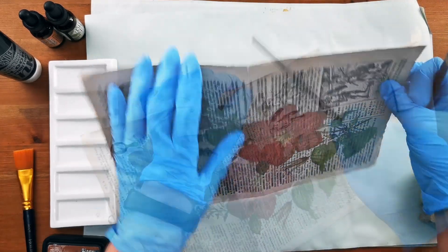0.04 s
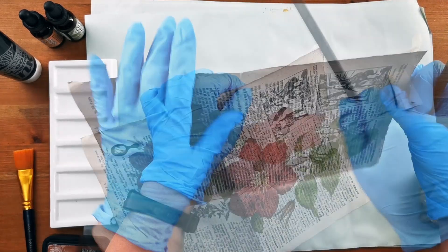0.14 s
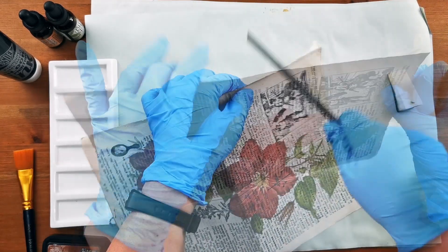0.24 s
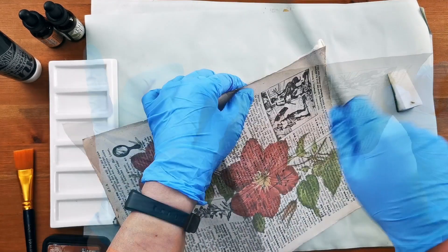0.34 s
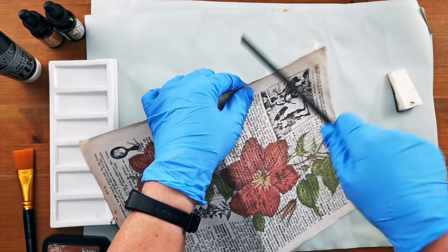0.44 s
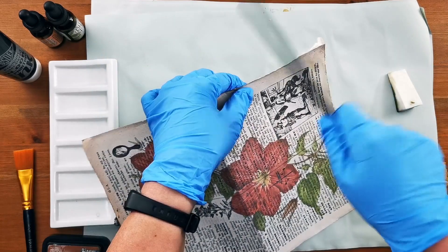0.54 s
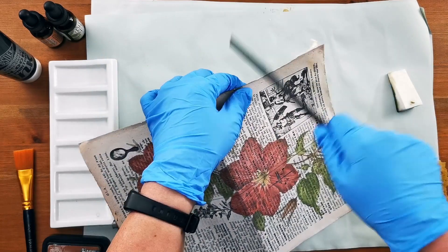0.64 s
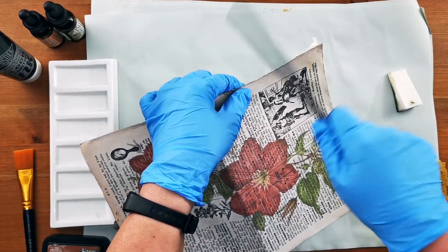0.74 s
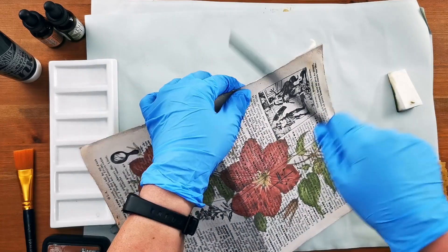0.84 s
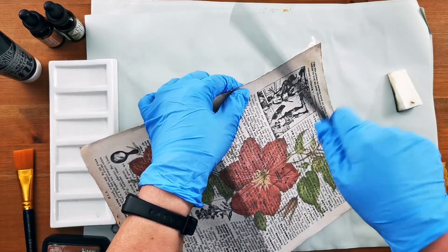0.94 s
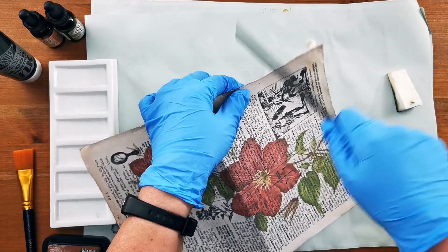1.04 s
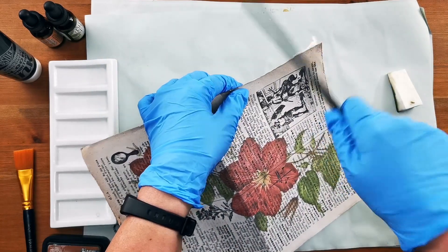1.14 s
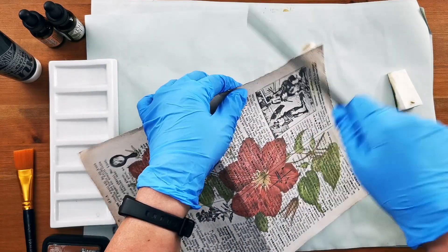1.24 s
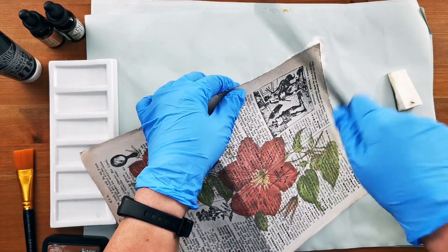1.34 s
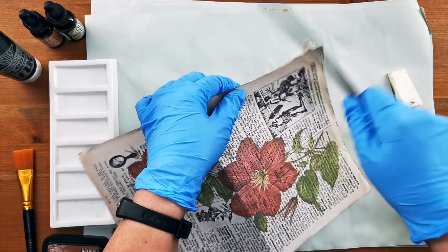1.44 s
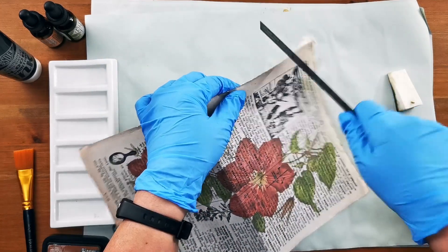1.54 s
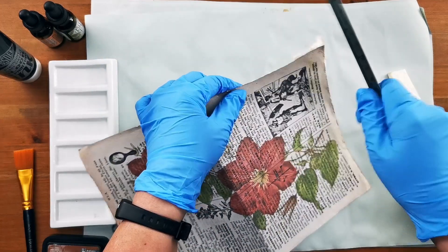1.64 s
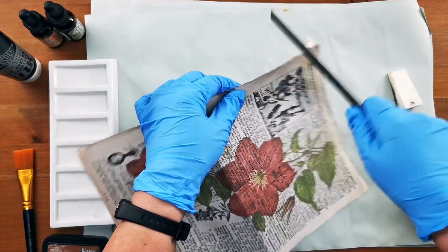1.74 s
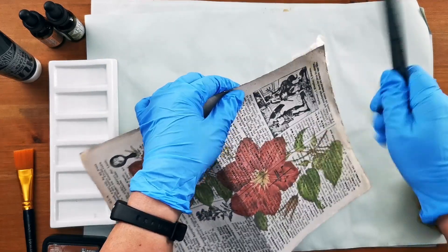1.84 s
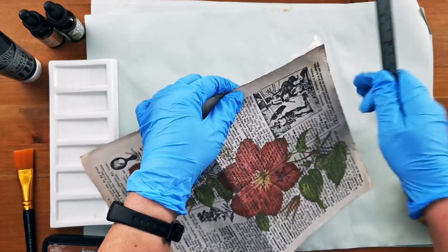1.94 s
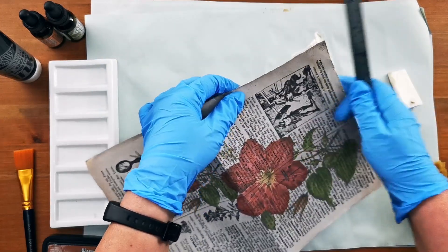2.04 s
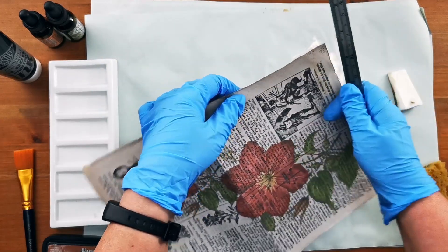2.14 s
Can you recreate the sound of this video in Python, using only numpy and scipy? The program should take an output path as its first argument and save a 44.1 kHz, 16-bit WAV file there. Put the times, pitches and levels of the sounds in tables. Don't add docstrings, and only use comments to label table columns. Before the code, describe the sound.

Quick dry cracks of a steel ruler flicked against heavy paper, with light rustling between blows

```python
import sys
import numpy as np
from scipy import signal
from scipy.fft import rfft, irfft
from scipy.io import wavfile
from scipy.ndimage import uniform_filter1d

SR = 44100
rng = np.random.default_rng(int(sys.argv[2]) if len(sys.argv) > 2 else 0)


def to_wav(sig):
    pcm = np.clip(np.atleast_2d(sig), -1, 1) * 32767
    pcm = np.round(pcm).astype(np.int16)
    wavfile.write(sys.argv[1], SR, pcm.T)


def voltage_ratio(level):
    return 10 ** (np.asarray(level, float) / 20)


N = 97020


def evened(x):
    return x / np.sqrt(np.mean(x ** 2) + 1e-20)


def read(points, hz):
    f, value = np.transpose(points)
    return np.interp(np.log(hz + 1), np.log(f + 1), value)


def colour(x, points):
    gain = voltage_ratio(read(points, np.fft.rfftfreq(len(x), 1 / SR)))
    return irfft(rfft(x) * gain, len(x))


def tilt(x, bright_db):
    b, a = signal.butter(1, 3500, "high", fs=SR)
    return x + (voltage_ratio(bright_db) - 1) * signal.lfilter(b, a, x)


def add(mix, s, sound):
    part = mix[round(s * SR):][:len(sound)]
    part += sound[:len(part)]


def ring(hz, t60, t):
    return voltage_ratio(-60 * t / t60) * np.sin(2 * np.pi * hz * t)


def rustle():
    # time in seconds, rustle level in dB.
    hands = [(0, -41.5), (.07, -37), (0.102, -43.5), (0.128, -31.5), (.2, -43.5), (0.234, -41),
             (.29, -52.5), (.94, -132), (0.993, -44), (1.02, -67), (1.3, -49), (1.34, -47), (1.4, -59.5),
             (1.88, -49), (1.955, -37), (1.985, -48), (2.131, -51.5), (2.2, -45.5)]
    # frequency in Hz, rustle spectrum in dB.
    rustle_colour = [(250, -39), (700, -16.5), (1500, -2), (2800, -5), (4700, -2), (7000, -4.5),
                     (11000, -8.5), (16000, -7.5)]
    grains_per_s, grain_spread_db, grain_share, flicker_db = 3000, 4, 0.3, 1.2
    sizes = voltage_ratio(grain_spread_db * np.minimum(rng.exponential(1, N), 4))
    occurs = rng.random(N) < grains_per_s / SR
    grains = sizes * occurs * rng.choice([-1., 1.], N)
    friction = grain_share * evened(grains) + (1 - grain_share) * rng.standard_normal(N)
    slow = uniform_filter1d(rng.standard_normal(N), size=300)
    flicker = evened(uniform_filter1d(slow, size=300))
    s, db = np.transpose(hands)
    motion_db = np.interp(np.arange(N) / SR, s, db)
    return evened(colour(friction, rustle_colour)) * voltage_ratio(motion_db + flicker_db * flicker)


def air():
    # frequency in Hz, murmur spectrum in dB.
    murmur = [(20, -20), (65, -6.5), (105, 3.5), (160, -4), (330, -8), (620, 3), (2500, -1), (15500, -24)]
    return voltage_ratio(-54) * evened(colour(rng.standard_normal(N), murmur))


def snaps(t, span, count):
    fade_db, spread_db = -9, 4
    out = np.zeros(len(t))
    draw = rng.random((count, 3))
    late = draw[:, 0] * (np.arange(count) > 0)
    size = voltage_ratio(fade_db * late - 2 * spread_db * draw[:, 1] * (late > 0))
    sign = np.where((draw[:, 2] < .5) | (late == 0), 1, -1)
    np.add.at(out, (late * span * SR).astype(int), size * sign)
    return out


def sheet(drive, t, boom_db):
    # resonance frequency in Hz, width in Hz, level in dB.
    sheet_modes = [(642.3, 83.3, 29.5), (710, 47, 9.5), (1084, 274, 10.5), (1418, 99, 16.5),
                   (1848, 230, 20.5), (2460, 87, 0.5), (2750, 780, -3), (3820, 390, -31), (5004, 133, 17),
                   (5700, 450, -51), (6500, 500, -40), (9450, 2700, -52), (12700, 4200, -18)]
    push_s, boom_top_hz, max_q = .0013, 900, 14
    detune, colour_db = .02, 2
    push = signal.oaconvolve(drive, np.hanning(round(push_s * SR / 2)))[:len(t)]
    push = push * np.linalg.norm(drive) / np.linalg.norm(push)
    out = np.zeros(len(t))
    draw = rng.uniform(-1, 1, (len(sheet_modes), 2))
    for (hz, width, db), (a, b) in zip(sheet_modes, draw):
        low = hz < boom_top_hz
        t60 = 2.2 / max(width, hz / max_q)
        mode = ring(hz * (1 + detune * a), t60, t)
        rung = signal.oaconvolve(push if low else drive, mode)[:len(t)]
        rung = rung * np.linalg.norm(mode) / np.linalg.norm(rung)
        out += voltage_ratio(db + colour_db * b + boom_db * low) * rung
    return out


def blow(db, boom_db, bright_db):
    # frequency in Hz, crack spectrum in dB.
    crack_colour = [(300, -30), (600, -8), (1400, 0), (3000, -7), (6000, -8), (9000, -11), (13000, -13),
                    (16000, -20)]
    hold_s, crack_t60, fizz_db, fizz_t60 = .0028, .008, -8, .045
    t = np.arange(4096) / SR
    body = sheet(snaps(t, span=.0024, count=6), t, boom_db)
    burst = voltage_ratio(-60 * np.maximum(t - hold_s, 0) / crack_t60)
    fizz = voltage_ratio(fizz_db - 60 * t / fizz_t60)
    crack = evened(colour(rng.standard_normal(len(t)), crack_colour)) * (burst + fizz)
    return voltage_ratio(db) * tilt(body / abs(body).max() + voltage_ratio(-14) * crack, bright_db)


def thin(x):
    cut = signal.sosfilt(signal.butter(4, 567, "high", fs=SR, output="sos"), x)
    leak = signal.sosfilt(signal.butter(2, 180, "high", fs=SR, output="sos"), x)
    return cut + voltage_ratio(-23.5) * leak


def room(x):
    # frequency in Hz, reverberation time t60 in seconds.
    band_t60 = [(200, 0.26), (630, 0.28), (1500, 0.34), (4000, 0.28), (8000, 0.34), (15000, 0.6)]
    # frequency in Hz, spectrum of the sheet's shiver in the room in dB.
    shiver_colour = [(100, -31.5), (300, -7), (480, -10.5), (640, 0), (1300, -2.5), (3500, -7.5),
                     (8000, -17), (15000, -30.5)]
    start_s, rise_s, shiver_db, echo_db = 0.0098, 0.015, -32.5, -18
    hz, t, z = signal.stft(rng.standard_normal(SR // 2), SR, nperseg=256)
    decay = voltage_ratio(-60 * t / read(band_t60, hz)[:, None])
    tail = signal.istft(z * decay, SR, nperseg=256)[1]
    tail = tail * np.clip((np.arange(len(tail)) / SR - start_s) / rise_s, 0, 1) ** 2
    echo = signal.fftconvolve(x, tail / np.linalg.norm(tail))[:len(tail)]
    shiver = colour(tail, shiver_colour)
    shiver = shiver / np.sqrt(np.mean(shiver[:4096] ** 2))
    return voltage_ratio(echo_db) * echo + voltage_ratio(shiver_db) * abs(x).max() * shiver


def flap(db, length):
    t = np.arange(4096) / SR
    body = tilt(sheet(snaps(t, length, count=14), t, boom_db=-6), bright_db=-5)
    return voltage_ratio(db) * body / abs(body).max()


def tink(db, favoured):
    # mode frequency in Hz, level in dB, decay time t60 in seconds.
    ruler_modes = [(7150, -3, .06), (8053, -3, .09), (9060, -4, .08), (10600, -4, .1), (12532, 0, .17),
                   (15200, -2, .07)]
    t = np.arange(8192) / SR
    modes = np.zeros(len(t))
    for hz, mode_db, t60 in ruler_modes:
        other = abs(hz / favoured - 1) > .06
        modes += voltage_ratio(mode_db - 14 * other) * ring(hz, t60, t)
    return voltage_ratio(db) * np.minimum(t / .002, 1) * modes


def tick(db):
    # mode frequency in Hz, width in Hz, level in dB.
    click_modes = [(2100, 500, -34), (4330, 480, 21.5), (7000, 200, 21.5), (10900, 650, 12),
                   (11700, 900, -18), (15000, 900, -27)]
    t = np.arange(1024) / SR
    body = np.zeros(len(t))
    for hz, width, mode_db in click_modes:
        body += voltage_ratio(mode_db) * ring(hz * rng.uniform(.98, 1.02), 2.2 / width, t)
    body = signal.oaconvolve(snaps(t, span=.0015, count=3), body)[:len(t)]
    return voltage_ratio(db) * body / abs(body).max()


def crackle(db, length):
    # frequency in Hz, crackle spectrum in dB.
    crease_colour = [(800, -12), (2500, -4), (4500, 8), (7500, -8.5), (12000, -6), (16000, -32)]
    t = np.arange(2048) / SR
    return voltage_ratio(db - 20 * t / length) * evened(colour(rng.standard_normal(len(t)), crease_colour))


def puff(db):
    return voltage_ratio(db) * np.hanning(round(.0025 * SR))


def scene():
    # start in seconds, peak in dB, sheet boom in dB, brightness in dB, room tail in dB.
    blow_events = [
        (0.11, -14, -15.5, -5, 2),
        (0.2944, -5, -9, -13, 1),
        (0.4717, 2.5, -10.5, -3, -5.5),
        (0.658, -2, -8.5, 3.5, -6),
        (0.8471, -2.5, -0.5, -13.5, -0.5),
        (1.0397, 1, -4, -5, -5),
        (1.2381, 1, -9, -15, -2.5),
        (1.4207, 4.5, -13, -4.5, -5),
        (1.6084, -1.5, -3.5, 4, -3.5),
        (1.7943, 2.5, 16, -35, -2),
    ]
    # start in seconds, level in dB, length in seconds.
    flap_events = [(.3221, -36, .016), (.5021, -34, .016), (.6861, -34, .012), (.8781, -38, .021),
                   (1.0681, -34, .014), (1.2621, -34, .016), (1.4534, -16, .003), (1.4601, -25, .013),
                   (1.6291, -27, .007), (1.6371, -19, .013), (1.8131, -20, .007), (1.1011, -37, .005)]
    # start in seconds, level in dB, favoured mode in Hz.
    tink_events = [(.337, -55, 12532), (.35, -58, 8053), (.345, -63, 10600), (.395, -55, 12532),
                   (.4, -61, 9060), (.575, -62, 8053), (.728, -54, 12532), (.86, -68, 12532),
                   (.937, -53, 8053), (.9375, -53, 15200), (.967, -60, 12532), (.977, -50, 7150),
                   (.99, -50, 7150), (1.715, -55, 12532), (1.716, -58, 8053)]
    # start in seconds, level in dB.
    tick_events = [
        (.9506, -17),
        (.9521, -20),
        (.9536, -20),
        (.9556, -31),
        (.9601, -33),
    ]
    # start in seconds, level in dB, length in seconds.
    crackle_events = [(1.001, -40, .008), (1.4491, -27, .004), (1.5461, -44, .006), (1.6351, -28, .005),
                      (1.326, -45, .006), (1.361, -46, .008), (1.721, -48, .004), (.9541, -36, .012),
                      (1.0681, -38, .005)]
    # start in seconds, level in dB.
    puff_events = [
        (1.2376, -37),
        (1.4211, -23),
        (1.6081, -29),
        (1.0401, -44),
    ]
    mix = rustle() + air()
    hits = np.zeros(N)
    for s, db, boom_db, bright_db, tail_db in blow_events:
        hit = thin(blow(db, boom_db, bright_db))
        add(mix, s, hit)
        add(mix, s, voltage_ratio(tail_db) * tilt(room(hit), bright_db / 2))
    for s, db, length in flap_events:
        add(hits, s, flap(db, length))
    for s, db, favoured in tink_events:
        add(mix, s, tink(db, favoured))
    for s, db in tick_events:
        add(hits, s, tick(db))
    for s, db, length in crackle_events:
        add(mix, s, crackle(db, length))
    for s, db in puff_events:
        add(mix, s, puff(db))
    return (mix + thin(hits))[None]


def low_pass(x):
    return signal.sosfilt(signal.butter(12, 16440, fs=SR, output="sos"), x)


def record(dry):
    x = np.clip(dry, -1, 1)
    x = signal.oaconvolve(x, signal.firwin(255, 15900, fs=SR)[None], "same")
    return low_pass(x)


dry = scene()
out = record(dry)
to_wav(out)
```